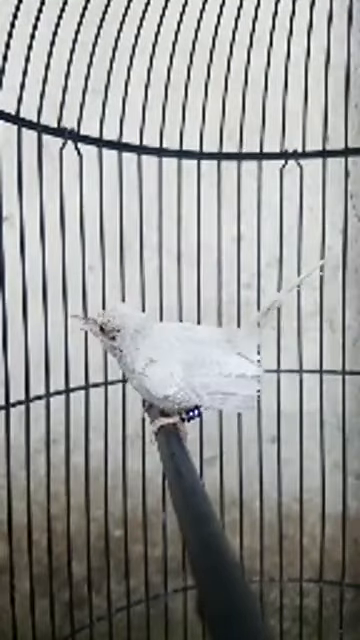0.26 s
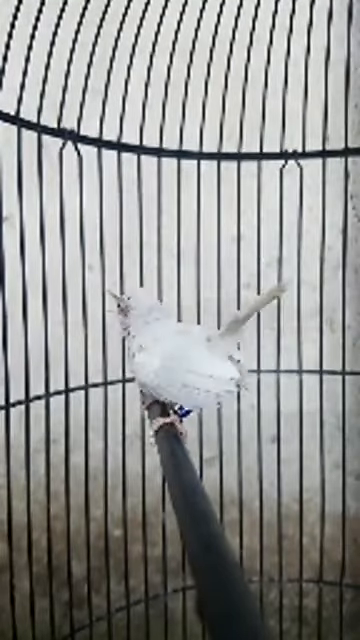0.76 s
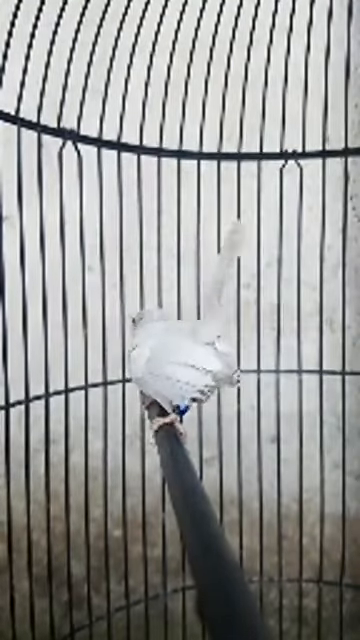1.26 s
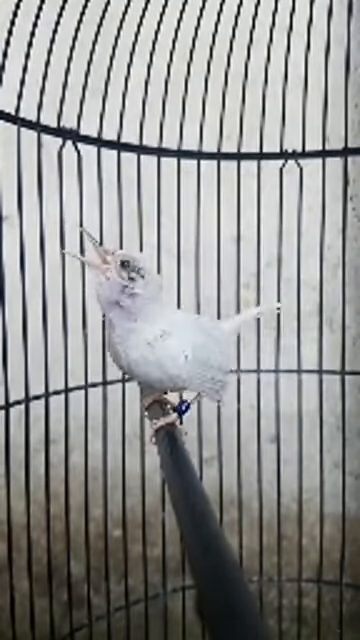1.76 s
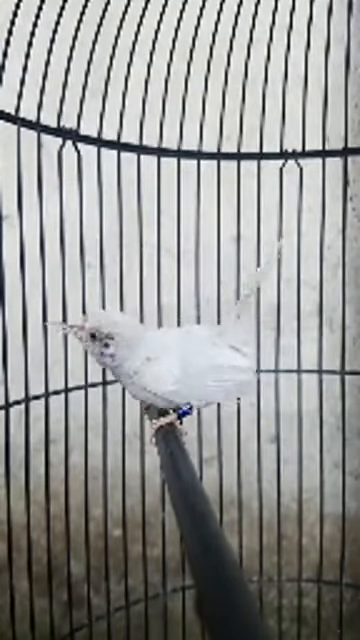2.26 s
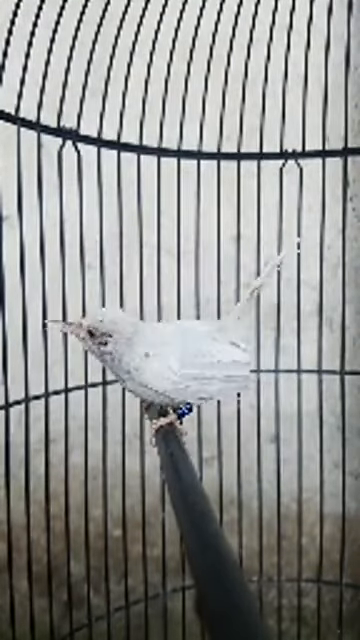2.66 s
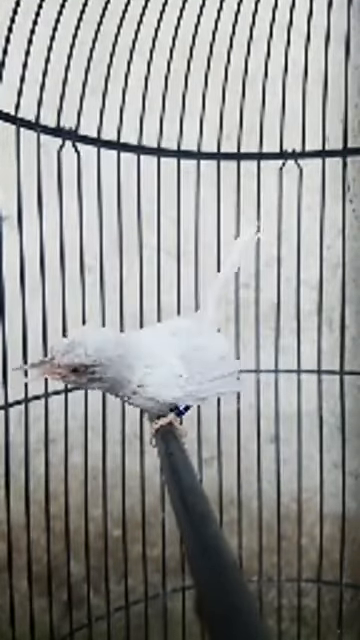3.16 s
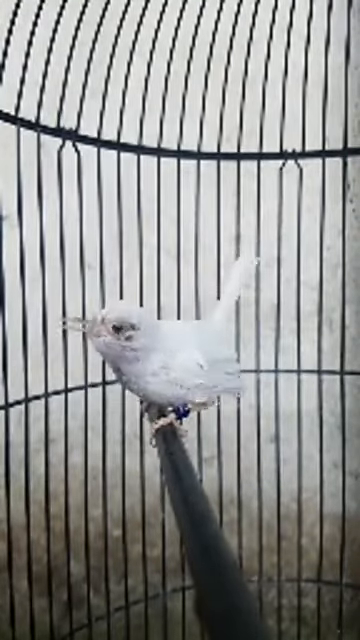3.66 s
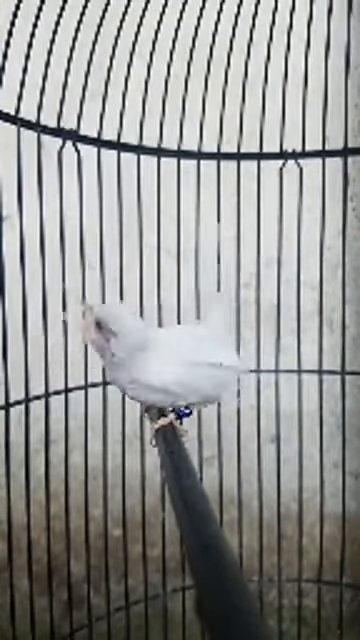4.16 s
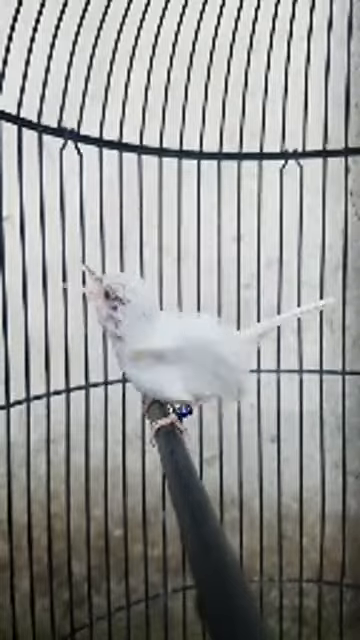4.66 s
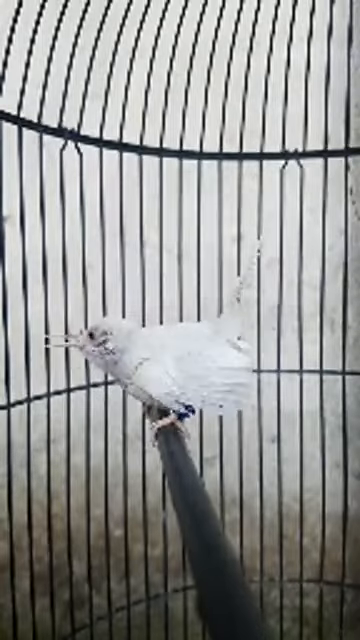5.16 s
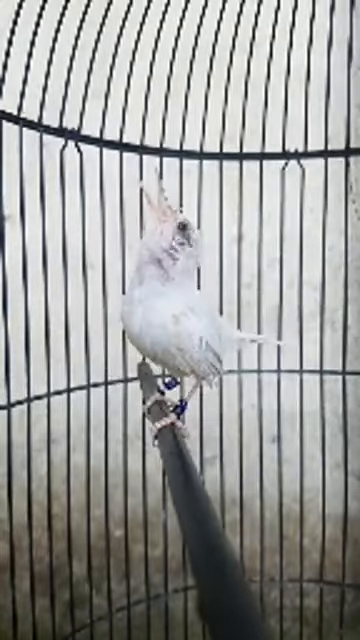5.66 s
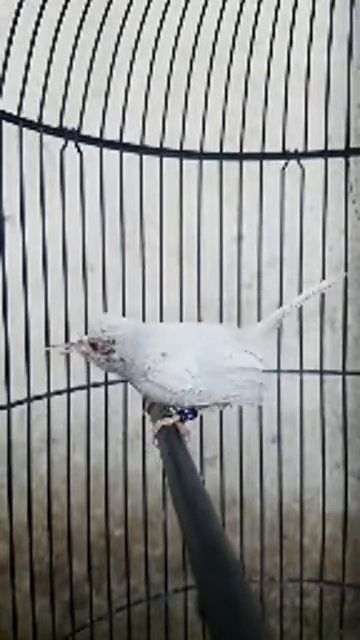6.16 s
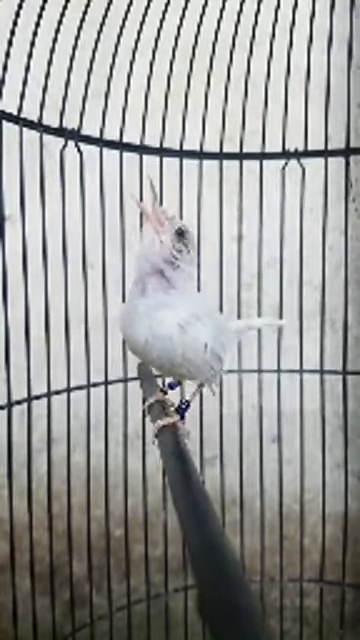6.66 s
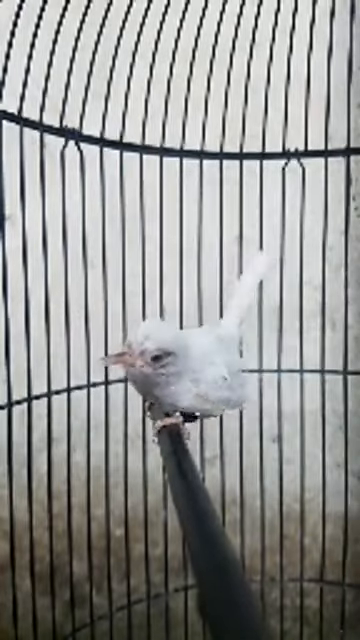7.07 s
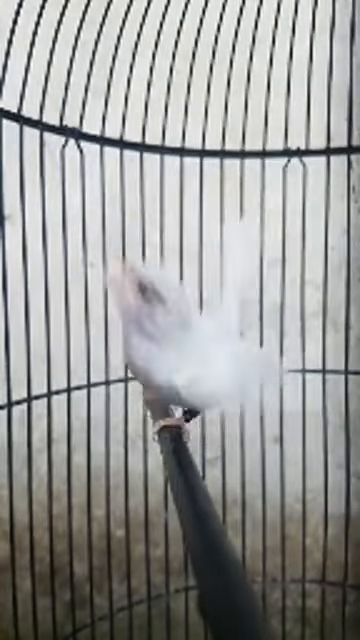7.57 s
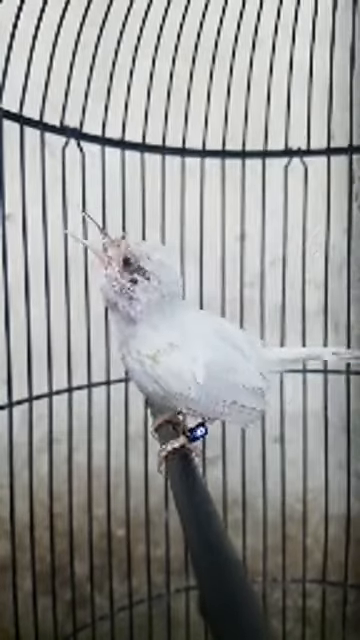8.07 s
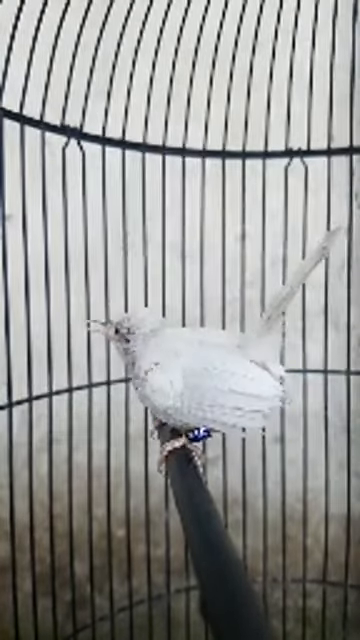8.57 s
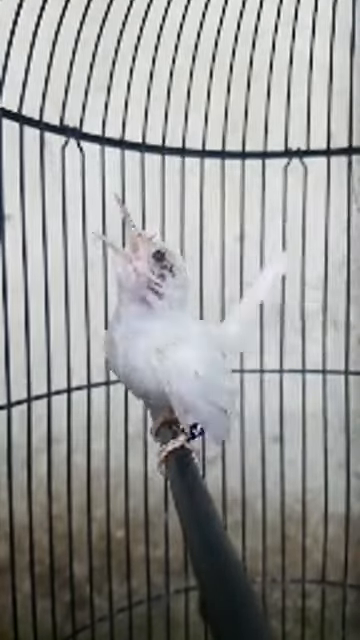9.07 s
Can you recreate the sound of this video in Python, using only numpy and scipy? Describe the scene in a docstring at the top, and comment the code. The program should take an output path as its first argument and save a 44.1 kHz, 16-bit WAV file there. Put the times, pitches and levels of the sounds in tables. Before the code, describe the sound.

Two small songbirds close by in a hard-walled room exchange loud, high phrases without let-up. Each phrase is a quick rising flick, a whistle swooping down and holding about a third of a second, then a bright swinging chirp. The birds alternate, sometimes overlapping. Short dry rattles of wing snaps and soft feather rustles fall between phrases, with a perch knock near the end. A distant engine throbs beneath low hums and room air.

```python
"""A hard-walled room, the microphone near two caged songbirds; a slow engine throbs far away.
The rival opens, then the first bird answers, and they trade phrases to the end, at times overlapping.
A phrase is a rising flick, a whistle that swoops down and holds, and a chirp: each a nearly pure tone.
Between phrases wings snap in short rattles of noise and feathers rustle; later feet knock the perch.
Under it lie wavering hums and room air; a whine fades midway, then the engine speeds up slightly."""
import sys
import numpy as np
from scipy import signal
from scipy.fft import rfft, irfft, next_fast_len
from scipy.io import wavfile
from scipy.ndimage import uniform_filter1d, minimum_filter1d, map_coordinates

SR = 44100
rng = np.random.default_rng(int(sys.argv[2]) if len(sys.argv) > 2 else 0)


def master_out(mix):
    """Clip the mix to full scale and print it as 16-bit PCM to the path in sys.argv[1]."""
    frames = np.transpose(np.atleast_2d(mix))
    ceiling = np.clip(frames, -1, 1)
    pcm = np.round(ceiling * 32767).astype(np.int16)
    wavfile.write(sys.argv[1], SR, pcm)


N = 411012

# The first bird's whistles: t/s, length/s, pitch shift/Hz, flick level/dB (added to the flick's peak),
# then whistle levels early/dB, late/dB, last push/dB
BIRD_WHISTLES = [(.68, 0.41, 2.5, -1, -17, -20.5, -12.5), (1.764, 0.43, 6.5, 0.5, -18.5, -17, -15),
                 (3.029, .383, 20, 0.5, -16.5, -16.5, -8), (4.318, 0.39, 3, 0, -19.5, -15.5, -13),
                 (5.497, .42, -15, -3.5, -23.5, -16.5, -15), (6.566, 0.3925, 7, 0.5, -19.5, -18, -12.5),
                 (7.838, 0.3904, -11.5, -0.5, -18, -16.5, -11), (9.222, 0.34, -1, -2.5, -20, -13.5, -13)]
# Its closing chirps: t/s, level/dB (added to the level of every note in the chirp)
BIRD_CHIRPS = [(1.145, -1), (2.218, -1), (3.454, 1.35), (4.759, -0.25), (5.965, 0.04), (7.008, 1),
               (8.28, 0)]
# Gliding notes, named settings: length/s, first and last f/Hz, peak level/dB, attack/s,
# lasting roughness and extra roughness at the onset (ratios to the tone)
BIRD_FLICK = dict(length_s=.024, first_hz=3148, last_hz=3878, peak_db=-6, attack_s=0.0079, rough=0.015, onset_rough=0.11)
BIRD_CHIP = dict(length_s=.034, first_hz=3460, last_hz=2200, peak_db=-11.5, attack_s=0.0066, rough=0.082, onset_rough=0.39)
BIRD_CHIP_UPPER = dict(length_s=0.024, first_hz=4110, last_hz=3680, peak_db=-28.5, attack_s=.004, rough=0.14, onset_rough=.5)  # the chip's faint upper voice
# Whistle pitch: held f/Hz, swoop height/Hz and time/s, settling/Hz, sag/(Hz/s), end bend/Hz and time/s
BIRD_PITCH = dict(held_hz=3423.8, swoop_hz=1061, swoop_s=.012, settle_hz=530, sag_hz_per_s=76, bend_hz=115, bend_s=0.029)
# Whistle effort: swoop level/dB, attack/s, release/s, rise to the last push/s, hold of the push/s
BIRD_EFFORT = dict(swoop_db=-12.5, attack_s=0.012, release_s=0.0091, push_s=0.029, hold_s=0.016)
# Arched chirp: turning points (t/s into the chirp, f/Hz), top level/dB, loss/(dB/octave) below the top,
# tiring/(dB/s), attack/s, release/s, roughness at the top (ratio to the tone)
BIRD_ARCH = dict(turns=[(.038, 1457), (.067, 3449), (.098, 1480)],
             top_db=-7, db_per_octave=20.5, tiring_db_per_s=38, attack_s=.012, release_s=0.024, rough=0.037)


def bird():
    """First songbird: whistled phrases closed by a falling two-voiced chip and an arched chirp."""
    whistled = whistles(BIRD_WHISTLES, BIRD_FLICK, BIRD_PITCH, BIRD_EFFORT, sub_db=-46)
    chirped = chirps(BIRD_CHIRPS, [BIRD_CHIP, BIRD_CHIP_UPPER], BIRD_ARCH, sub_db=-43)
    return voice_colour(whistled + chirped)


# The rival's tables have the first bird's columns
RIVAL_WHISTLES = [(.023, 0.3252, 0.5, 0, -21.5, -11.5, -7), (1.896, .306, 1.5, 1.5, -20.5, -12, -8.5),
                  (3.508, 0.32, -17, 0, -22.5, -7, -7.5), (5.065, .322, 5.5, 0.27, -18.5, -9, -6),
                  (6.926, .323, 1, 3.1, -18, -22, -9), (8.546, 0.3186, -7, 0.12, -19.5, -8, -7)]
RIVAL_CHIRPS = [(.408, -0.31), (2.266, -0.43), (3.892, .3), (5.446, 0.11), (7.31, 0), (8.93, 0.97)]
RIVAL_FLICK = dict(length_s=.024, first_hz=3287, last_hz=4210, peak_db=-19, attack_s=0.01, rough=0.37, onset_rough=0.59)
RIVAL_PITCH = dict(held_hz=3391, swoop_hz=1667, swoop_s=.0205, settle_hz=13, sag_hz_per_s=430, bend_hz=-450, bend_s=0.0059)
RIVAL_EFFORT = dict(swoop_db=-16, attack_s=0.008, release_s=.022, push_s=0.042, hold_s=.05)
RIVAL_WARBLE = dict(turns=[(.001, 3092), (.0245, 1704), (.051, 3290), (.097, 1995)],
                top_db=-2, db_per_octave=23.5, tiring_db_per_s=60, attack_s=0.0052, release_s=.03, rough=0.013)


def rival():
    """Second songbird: the same whistled gesture, closed by a warble without a chip."""
    whistled = whistles(RIVAL_WHISTLES, RIVAL_FLICK, RIVAL_PITCH, RIVAL_EFFORT, sub_db=-57)
    chirped = chirps(RIVAL_CHIRPS, [], RIVAL_WARBLE, sub_db=-54)
    return voice_colour(whistled + chirped)


SWOOP_DELAY_S = .026  # from flick to swoop
SWOOP_ROUGH, SWOOP_RASP_S = 0.21, 0.02  # the swoop starts rough and then clears


def whistles(rows, flick, pitch, effort, sub_db):
    """A rising flick, then the long whistle: the same gesture each time, with a new swell."""
    song = np.zeros(N)
    for s, length_s, shift_hz, flick_db, *held_db in rows:
        hz, db, rough = glide(**flick)
        add(song, s, syrinx(hz + shift_hz, db + flick_db, rough, sub_db))

        t = clock(length_s - SWOOP_DELAY_S)
        hz = whistle_pitch(t, **pitch) + shift_hz
        db = whistle_level(t, held_db, **effort)
        rough = SWOOP_ROUGH * np.exp(-t / SWOOP_RASP_S)
        add(song, s + SWOOP_DELAY_S, syrinx(hz, db, rough, sub_db))
    return song


SWOOP_SHAPE = 1.25  # above 1 the swoop hangs briefly before it drops
SETTLE_S = .068  # time to settle on the held pitch


def whistle_pitch(t, held_hz, swoop_hz, swoop_s, settle_hz, sag_hz_per_s, bend_hz, bend_s):
    """A fast drop and a slower settling onto a slowly sagging pitch, which bends as the note ends."""
    swoop = swoop_hz * np.exp(-(t / swoop_s) ** SWOOP_SHAPE)
    settling = settle_hz * np.exp(-t / SETTLE_S)
    end_bend = bend_hz * np.exp((t - t[-1]) / bend_s)
    return held_hz + swoop + settling - sag_hz_per_s * t + end_bend


ACCENT_S = 0.015  # time in which the swoop's level gives way to the early level


def whistle_level(t, held_db, swoop_db, attack_s, release_s, push_s, hold_s):
    """The swoop's level, then a course through the early, late and last levels, in dB."""
    stages = np.sort([attack_s, attack_s + ACCENT_S, t[-1] - hold_s - push_s, t[-1] - hold_s])
    course_db = np.interp(t, stages, [swoop_db, *held_db])
    return course_db + fades(t, attack_s, release_s) + 0.14 * wobble(49, len(t))


def chirps(rows, chips, shape, sub_db):
    """The end of each phrase: a falling chip, if the bird has one, and a swinging chirp."""
    song = np.zeros(N)
    notes = [(0, *glide(**chip)) for chip in chips] + [swing(**shape)]
    for s, chirp_db in rows:
        for delay_s, hz, db, rough in notes:
            add(song, s + delay_s, syrinx(hz, db + chirp_db, rough, sub_db))
    return song


ROUGH_GROWS = .7  # dB more roughness for each dB that a chirp weakens


def swing(turns, top_db, db_per_octave, tiring_db_per_s, attack_s, release_s, rough):
    """Delay, pitch, level and roughness of a swinging note: strong on top, weak and rough below."""
    when, turn_hz = np.transpose(turns)
    t = when[0] + clock(when[-1] - when[0])
    corners = np.arange(len(when))
    leg = np.interp(t, when, corners)
    eased = np.floor(leg) + (1 - np.cos(np.pi * (leg % 1))) / 2  # slow at each turning point
    hz = np.interp(eased, corners, turn_hz)
    weakening_db = db_per_octave * np.log2(hz / hz.max()) + fades(t, attack_s, release_s)
    level_db = top_db + weakening_db - tiring_db_per_s * (t - t[0])
    roughness = np.minimum(1, rough * amp(-ROUGH_GROWS * weakening_db))
    return when[0], hz, level_db, roughness


GLIDE_EASE = 1.5  # above 1 a glide slows towards its end
ONSET_RASP_S = 0.0044  # time in which a rough onset clears


def glide(length_s, first_hz, last_hz, peak_db, attack_s, rough, onset_rough):
    """Pitch, level and roughness of a short note that slides one way and dies as it goes."""
    t = clock(length_s)
    hz = last_hz + (first_hz - last_hz) * (1 - t / length_s) ** GLIDE_EASE
    level_db = peak_db + fades(t, attack_s, length_s - attack_s)
    return hz, level_db, rough + onset_rough * np.exp(-t / ONSET_RASP_S)


FADE_DB = 26  # depth from which a note rises and to which it falls


def fades(t, attack_s, release_s):
    """Attack, hold and release of a note, in dB below its full level."""
    rising = np.clip(1 - (t - t[0]) / attack_s, 0, 1)
    falling = np.clip(1 - (t[-1] - t) / release_s, 0, 1)
    return -FADE_DB * (rising ** 2 + falling ** 2)


# Partials over the tone: multiple of its f, level/dB relative to it at full effort, before flutter
OVERTONES = [(1.5, -53.5), (2, -32), (3, -44.5), (4, -44)]


def syrinx(hz, db, rough, sub_db, waver=0.0012, rasp_hz=1200, full_db=-10, flutter_db=4, hiss_db=-22):
    """One note: a nearly pure tone that rasps and hisses where the membrane starts or sweeps."""
    n = len(hz)
    phase = turn(uniform_filter1d(hz, size=130) * (1 + waver * wobble(90, n)))
    tone = np.sin(phase)
    undertone = amp(sub_db) * np.sin(phase / 2)  # alternate cycles differ a little

    effort_db = .5 * (db - full_db)  # overtones grow faster than the tone
    overtones = np.zeros(n)
    for multiple, level_db in OVERTONES:
        strength = amp(level_db + effort_db + flutter_db * wobble(32, n))
        overtones += strength * np.sin(multiple * phase + 0.41 * multiple * wobble(330, n))

    rasp = wobble(rasp_hz, n) * tone + wobble(rasp_hz, n) * np.cos(phase)
    hiss = amp(hiss_db) * rng.standard_normal(n)
    from_edge = np.minimum(np.arange(n), np.arange(n)[::-1])
    edges = np.minimum(1, from_edge / (0.0022 * SR))  # no clicks at the ends
    return np.sqrt(2) * amp(db) * edges * (tone + undertone + overtones + rough * (rasp + hiss))


# Tone colour of the voices at the microphone, dull above about 6 kHz: f/Hz, level/dB
VOICE_COLOUR = [(5000, -0.5), (5800, -12.5), (6700, -24.5), (8200, -30), (10300, -20.5), (12500, -29),
                (14000, -9), (16000, -32.5)]


def voice_colour(song):
    """Colours every note, dimming its treble as the microphone does."""
    return filtered(song, lambda hz: amp(along(VOICE_COLOUR, hz)))


# Rattles of wing snaps: t/s, gap between snaps/s, number of snaps, level/dB (before scatter)
RATTLES = [(.565, .0155, 3, -26.5), (1.715, .013, 5, -25), (3.304, .013, 5, -27), (4.193, .0152, 4, -25.5),
           (4.871, 0.012, 5, -27.5), (6.737, 0.01, 5, -26.5), (7.711, .016, 4, -27.5),
           (8.38, .0125, 3, -26.5), (9.103, .016, 3, -25)]
# Spectral shape of a snap: f/Hz, relative level/dB
SNAP = [(400, -29), (900, -15.5), (1600, -5.5), (2700, -5.5), (4200, 1.5), (5800, -7), (6900, -17.5),
        (7600, -31.5), (9500, -38.5), (13000, -35), (16000, -44.5)]
# Feather rustles: t/s, length/s, level/dB (before flutter)
RUSTLES = [(1.276, .48, -58.5), (4.822, 0.059, -44.5), (8.343, 0.055, -48.5), (9.136, 0.16, -45)]
# Spectral shape of the rustle: f/Hz, relative level/dB
FEATHERS = [(500, -16.5), (1200, -10), (2500, -2), (4000, -2.5), (5200, -12), (6800, -20.5), (8000, -31.5),
            (14000, -37)]
SNAP_SCATTER_DB, RUSTLE_FLUTTER_DB = 1.8, 3.5


def wings(snap_t60=0.0058, first_db=-8):
    """Each wingbeat is a dry decaying burst of noise; feathers rustle as the bird shifts."""
    snaps, rustle, t = np.zeros(N), np.zeros(N), clock(.02)
    for s, gap_s, count, db in RATTLES:
        for beat in range(round(count)):
            soft_db = first_db if beat == 0 and count > 3 else 0  # longer rattles start softer
            snap_db = db + soft_db + rng.normal(0, SNAP_SCATTER_DB)
            add(snaps, s + beat * gap_s, amp(snap_db - 60 * t / snap_t60))
    for s, length_s, db in RUSTLES:
        add(rustle, s, amp(db) * signal.windows.tukey(int(length_s * SR)))
    flutter = amp(RUSTLE_FLUTTER_DB * wobble(46))
    return coloured(snaps * rng.standard_normal(N), SNAP) + rustle * flutter * noise(FEATHERS)


# Feet on the perch: t/s, level/dB
KNOCKS = [(6.482, -43), (9.201, -26)]
# Spectral shape of a knock: f/Hz, relative level/dB
PERCH = [(150, -19), (400, -3.5), (900, 3), (1250, -4), (2000, -4.5), (4000, -22), (9000, -40.5)]


def perch(t60=0.027):
    """A landing gives the perch a short, dull knock: decaying noise, weak in the treble."""
    blows, t = np.zeros(N), clock(.2)
    for s, db in KNOCKS:
        add(blows, s, amp(db - 60 * t / t60))
    return coloured(blows * rng.standard_normal(N), PERCH)


# Early echoes off the near walls: delay t/s, level/dB (before the source's own wall level)
WALLS = [(.0021, -22.5), (.0047, -17.5), (.0078, -14), (0.0116, -19)]
# Decay of the diffuse tail: f/Hz, t60/s
ROOM = [(500, 0.56), (3000, 0.3), (5000, 0.36), (12000, 0.093)]


def room(x, walls_db, tail_db, beam_db):
    """Direct sound, near-wall echoes, and a diffuse tail whose treble is raised or cut by beam_db."""
    out = x.copy()
    for delay_s, db in WALLS:
        add(out, delay_s, amp(db + walls_db) * x)
    hz, t, bins = signal.stft(rng.standard_normal(int(.7 * SR)), SR, nperseg=256)
    decay = amp(-60 * t / along(ROOM, hz)[:, None])
    tail = signal.istft(bins * decay, SR, nperseg=256)[1]
    tail /= np.linalg.norm(tail)
    tail = filtered(tail, lambda hz: amp(along([(4800, 0.00029), (5800, beam_db)], hz)))
    add(out, .005, amp(tail_db) * signal.fftconvolve(x, tail)[:N])
    return out


# The engine speeds up once: t/s, f/Hz of its fourth order
ENGINE = [(5.84, 57.25), (6.18, 58.55)]
# Firing orders: multiple of the firing rate, level/dB (before a slow wander)
ORDERS_DB = [(2, -66), (3, -61), (4, -48.5), (5, -55), (6, -53), (7, -51.5), (8, -52), (9, -51.5),
             (10, -61.5), (11, -59.5), (12, -64.5), (14, -59.5), (16, -66), (18, -59.5)]


def engine(throb=0.82, chuff_db=-53):
    """A slow engine far away: firing orders, and a puff of low noise with every stroke."""
    fourth_hz, = curves(ENGINE, np.arange(N) / SR)
    firing = turn(fourth_hz / 4)
    orders = np.zeros(N)
    for multiple, db in ORDERS_DB:
        orders += amp(db + wobble(1)) * np.sin(multiple * firing + rng.normal(0, 2.5))
    puff_shape = [(40, -21.5), (110, -2), (270, 2), (330, -13.5), (700, -26), (1500, -81)]  # f/Hz, dB
    chuff = (1 + throb * np.cos(firing)) * noise(puff_shape)
    return np.sqrt(2) * orders + amp(chuff_db) * chuff


def hum(hz, db, drift_hz):
    """One machine line, wavering in level and pitch."""
    return np.sqrt(2) * amp(db + 1.5 * wobble(6)) * np.sin(turn(hz + drift_hz * wobble(25)))


# The drone comes and goes: t/s, length/s, level/dB over its quiet level
DRONE_SWELLS = [(1.1, 0.65, 9), (2.6, 2.6, 8.5)]
# The whine recedes once: t/s, level/dB (before waver)
WHINE = [(4.8, -70), (6.2, -73.5)]
# Faint distant tones: t/s, length/s, first f/Hz, last f/Hz, level/dB (before waver)
FAR_TONES = [(.9, 0.38, 798, 805, -57.5), (2.091, 0.11, 816, 800, -56.5), (4.352, 0.32, 657.6, 680, -57),
             (4.684, 0.162, 730, 800, -56), (4.951, 0.13, 776, 800, -58.5), (7.713, 0.364, 590, 654, -60.5)]
# Spectral shape of the room's air: f/Hz, relative level/dB
FLOOR = [(25, -11.5), (250, -2), (400, -4), (700, -10.5), (1250, -10), (2000, -14), (4000, -22.5),
         (5200, -29), (6500, -39), (8500, -49), (10500, -41.5), (14000, -40.5), (16000, -49.5)]
AIR_WANDER_DB = .8


def background(hum_hz=128, hum_db=-50, drone_hz=184, quiet_drone_db=-59, whine_hz=978, air_db=-56):
    """Wavering machine hums, a few faint distant tones and the room's own air as shaped noise."""
    drone_db = np.full(N, float(quiet_drone_db))
    for s, length_s, db in DRONE_SWELLS:
        add(drone_db, s, db * signal.windows.tukey(int(length_s * SR)))
    whine_db, = curves(WHINE, np.arange(N) / SR)
    out = hum(hum_hz, hum_db, 2) + hum(drone_hz, drone_db, 2) + hum(whine_hz, whine_db, 6)
    for s, length_s, first_hz, last_hz, db in FAR_TONES:
        n = int(length_s * SR)
        level = amp(db + 2 * wobble(29, n)) * signal.windows.tukey(n)
        hz = np.linspace(first_hz, last_hz, n) + 15 * wobble(83, n)
        add(out, s, level * np.sin(turn(hz)))
    return out + amp(air_db + AIR_WANDER_DB * wobble(1.1)) * noise(FLOOR)


def amp(db):
    """Decibels to amplitude."""
    return 10 ** (np.asarray(db) / 20)


def unit(x):
    """x scaled to rms 1."""
    return x / np.sqrt(np.mean(x ** 2) + 1e-20)


def along(points, hz):
    """(f/Hz, value) points read on a log frequency axis."""
    f, v = np.transpose(points)
    return np.interp(np.log(hz + 1), np.log(f), v)


def curves(rows, t):
    """Each column after the time, read at the times t."""
    s, *cols = np.transpose(rows)
    return [np.interp(t, s, c) for c in cols]


def clock(seconds):
    """Sample times over a length in seconds."""
    return np.arange(int(seconds * SR)) / SR


def wobble(rate, size=N):
    """A smooth random curve, rate knots a second."""
    knots = rng.standard_normal(int(size * rate / SR) + 4)
    return map_coordinates(knots, [np.arange(size) * rate / SR])


def filtered(x, response):
    """x times a response of frequency."""
    m = next_fast_len(len(x) + 8192)
    return irfft(rfft(x, m) * response(np.fft.rfftfreq(m, 1 / SR)), m)[:len(x)]


def coloured(x, spectrum):
    """x through a (f/Hz, level/dB) response that keeps the power of white noise."""
    return filtered(x, lambda hz: unit(amp(along(spectrum, hz))))


def noise(spectrum):
    """Coloured noise of rms about 1."""
    return coloured(rng.standard_normal(N), spectrum)


def turn(hz):
    """Phase of a moving pitch."""
    return 2 * np.pi * np.cumsum(hz) / SR


def add(track, s, sound):
    """Mix a sound in at time s."""
    part = track[max(round(s * SR), 0):][:len(sound)]
    part += sound[:len(part)]


def scene():
    """Both birds and the cage sounds in one room, over the engine and the hums."""
    # the voices' treble is beamed past the microphone, so their tails are richer in it
    voices = room(bird(), walls_db=-2.5, tail_db=-19, beam_db=7)
    voices += room(rival(), walls_db=0, tail_db=-18, beam_db=9.5)
    movement = room(wings() + perch(), walls_db=2, tail_db=-15, beam_db=-1.5)
    return (voices + movement + engine() + background())[None]


TOP_HZ = 16000  # the recorder's band limit


def record(dry):
    """The recorder eases the highest peaks down and keeps nothing above its band limit."""
    needed = np.minimum(1, .87 / (np.abs(dry[0]) + 1e-9))
    gain = uniform_filter1d(minimum_filter1d(needed, size=260), size=200)
    return filtered(dry[0] * gain, lambda hz: hz < TOP_HZ)[None]


dry = scene()
out = record(dry)
master_out(out)
```